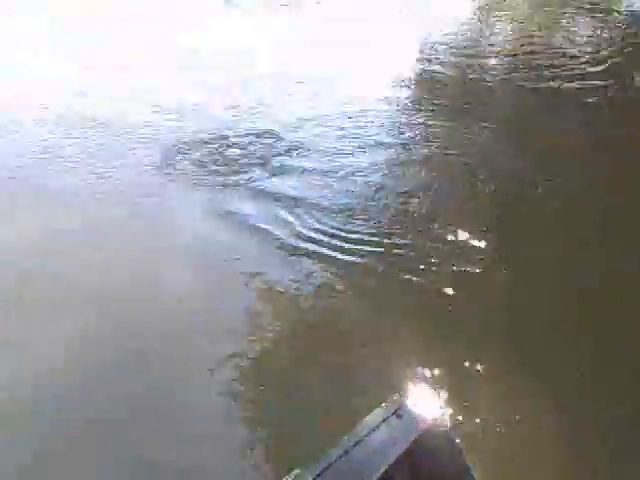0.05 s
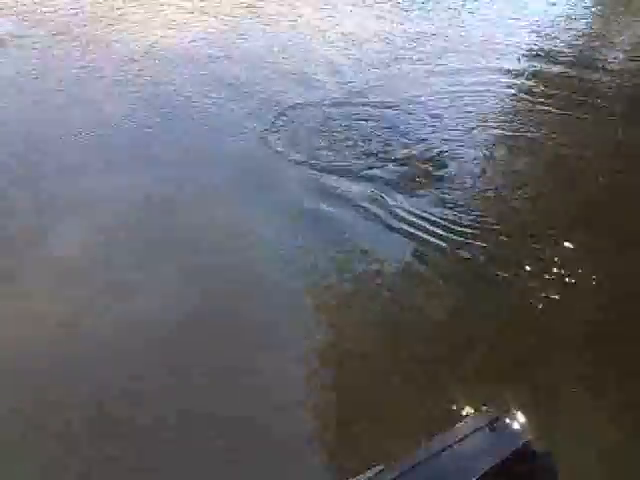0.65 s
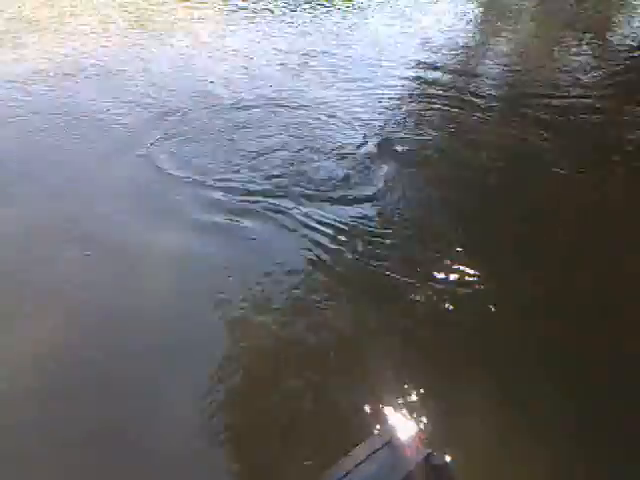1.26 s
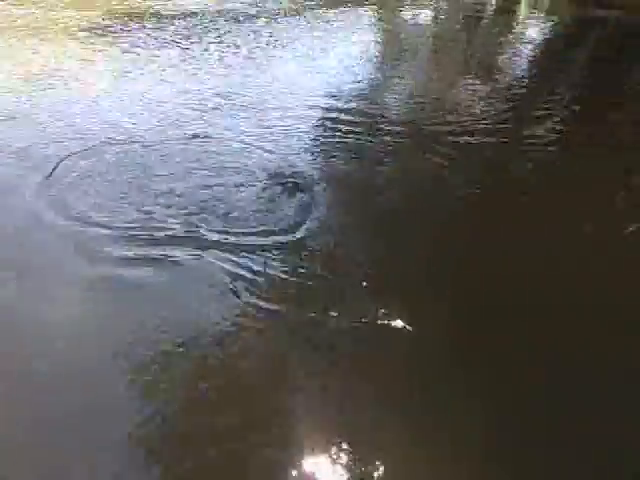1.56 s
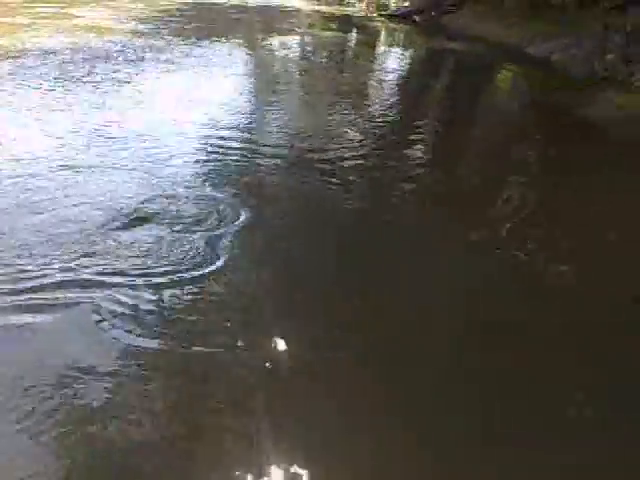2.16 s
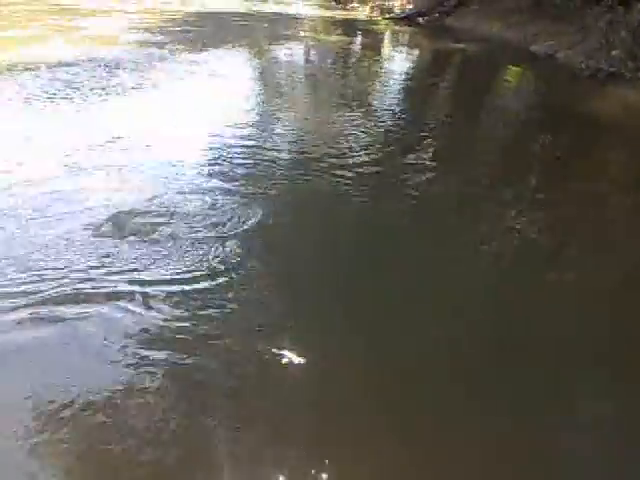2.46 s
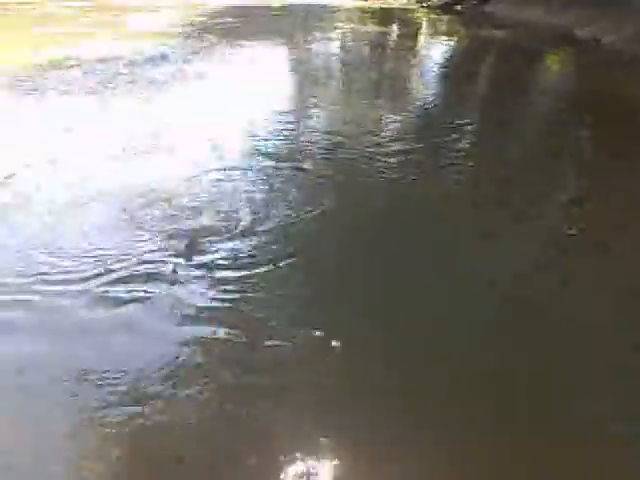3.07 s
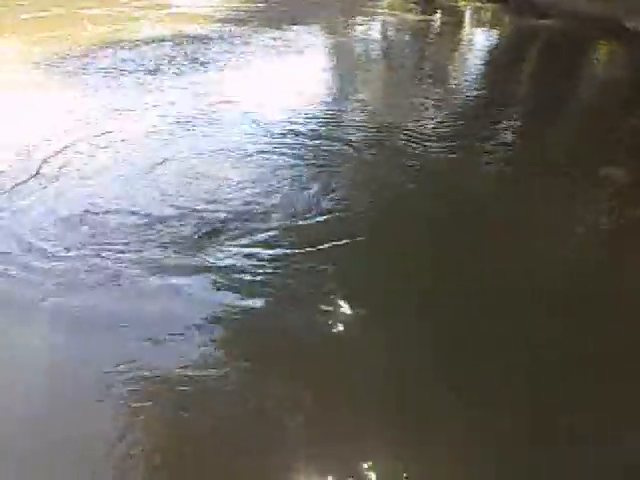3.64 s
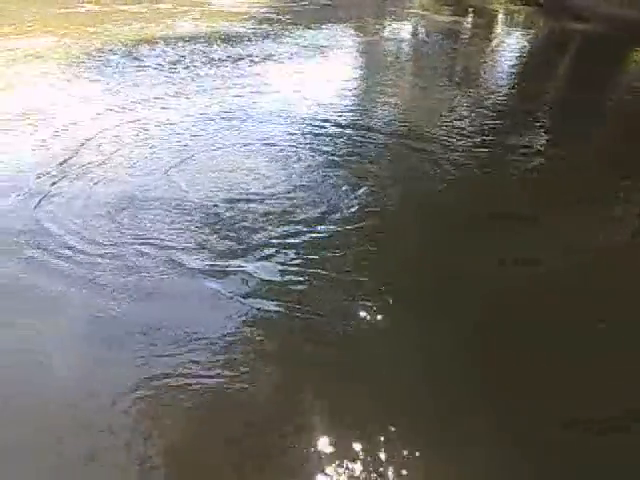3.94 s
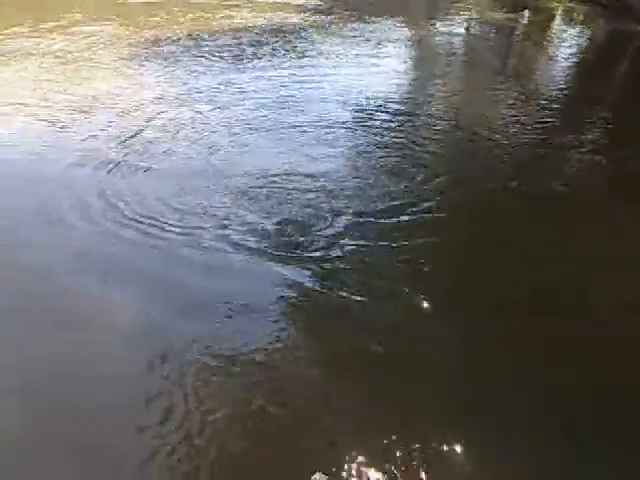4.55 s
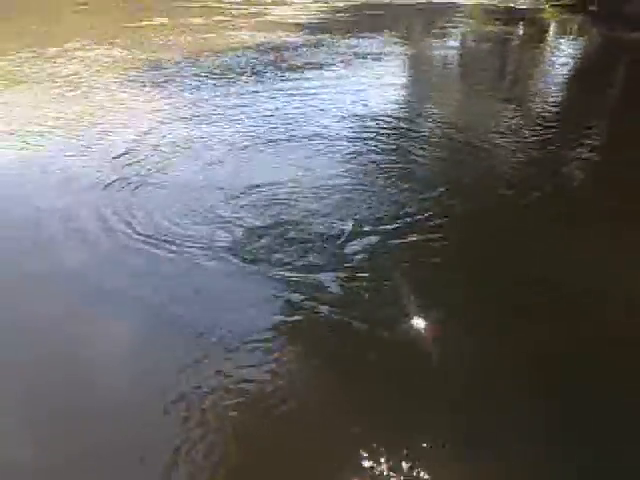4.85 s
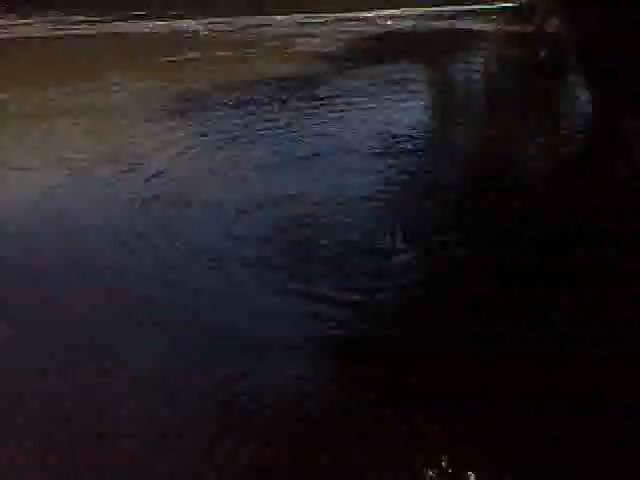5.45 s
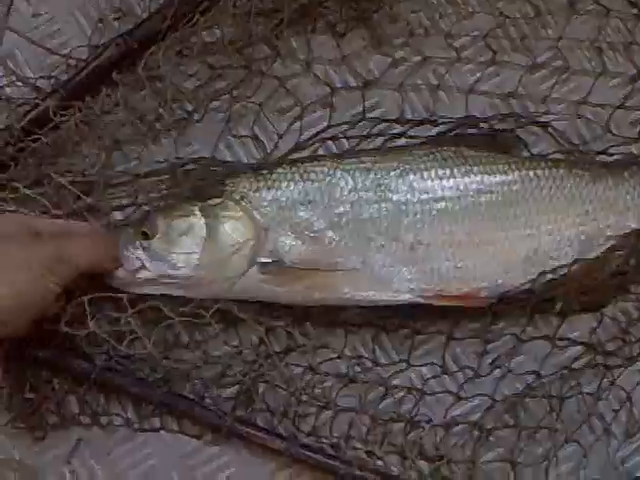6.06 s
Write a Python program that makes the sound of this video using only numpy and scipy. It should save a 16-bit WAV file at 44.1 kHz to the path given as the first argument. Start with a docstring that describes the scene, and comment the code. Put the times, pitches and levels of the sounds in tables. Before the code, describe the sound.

A hooked fish splashes and plops in a river over faint hiss, then gear knocks on a boat and scrapes the microphone.

```python
"""Splashes and plops come first: a hooked fish thrashes near a small boat, over river hiss and a low hum.
Each flick of its tail traps air that rings as bubbles, and throws spray that patters back down.
After five seconds gear knocks on the boat and scrapes hard against a camera, and fingers rub and click
on its case. The camera stops for a moment of silence, then starts again over the quiet deck."""
import sys
import numpy as np
from scipy import signal
from scipy.fft import rfft, irfft
from scipy.io import wavfile
from scipy.ndimage import uniform_filter1d

SR = 44100
rng = np.random.default_rng(int(sys.argv[2]) if len(sys.argv) > 2 else 0)


def wrap_up_sound(samples):
    """Save the sound to the file named by the first command line argument, as 16-bit audio."""
    columns = np.atleast_2d(samples).T
    # keep every value between -1 and 1, then stretch to whole-number steps
    tamed = np.clip(columns, -1, 1)
    steps = np.round(tamed * 32767).astype(np.int16)
    wavfile.write(sys.argv[1], SR, steps)


N = 278271
TIME = np.arange(N) / SR
STOP_S, RESTART_S = 5.89, 6.115


def amp(db):
    """Turns decibels into a gain."""
    return 10 ** (np.asarray(db) / 20)


def unit(x):
    """Scales a sound to an average (rms) level of 1."""
    return x / np.sqrt(np.mean(x ** 2) + 1e-20)


def level_at(tone, hz):
    """Reads the level in dB at any pitch from a tone table."""
    pitch_hz, level_db = np.transpose(tone)
    return np.interp(np.log(hz + 1), np.log(pitch_hz + 1), level_db)


def colour(x, tone):
    """Shapes the lows and highs of a sound by a tone table, at an average level of 1."""
    hz = np.fft.rfftfreq(len(x), 1 / SR)
    return unit(irfft(rfft(x) * amp(level_at(tone, hz)), len(x)))


def add(mix, start_s, sound):
    """Mixes a sound in at its start time."""
    part = mix[max(round(start_s * SR), 0):][:len(sound)]
    part += sound[:len(part)]


def envelope(t, rise_s, hold_s, fade_s):
    """Rises, holds, then dies away; a fade time is how long a sound takes to fall by 60 dB."""
    rise = np.sin(np.pi / 2 * np.clip(t / rise_s, 0, 1)) ** 2
    return rise * np.exp(-np.log(1000) * np.maximum(t - rise_s - hold_s, 0) / fade_s)


def patter(per_s, spread_db, size):
    """Tiny impacts at random moments, a few much larger than the rest."""
    hits = rng.random(size) < per_s / SR
    sign = rng.choice([-1, 1], size)
    strength = np.minimum(rng.exponential(1, size), 4)
    return hits * sign * amp(spread_db * strength)


def bubble(hz, fade_s, rise_cycles=1.8, glide=0.067):
    """An air pocket rings, its pitch climbing as it nears the surface."""
    t = np.arange(int((fade_s + rise_cycles / hz) * SR)) / SR
    phase = 2 * np.pi * hz * (t + glide * t ** 2 / (2 * fade_s))
    return envelope(t, rise_cycles / hz, 0, fade_s) * np.sin(phase)


def swarm(low_hz, high_hz, per_s, spread_db, cycles, sizes=60):
    """Bubbles of many sizes form at random moments, each ringing for a number of cycles."""
    out = np.zeros(N)
    bubbles = [bubble(hz, cycles / hz) * np.sqrt(hz) for hz in np.geomspace(low_hz, high_hz, sizes)]
    for when, which, chance in rng.random((int(per_s * N / SR), 3)):
        strength = min(-np.log(1 - chance), 4)
        add(out, when * N / SR, amp(spread_db * strength) * bubbles[int(which * sizes)])
    return out


# Tone of the air over the deck: pitch_hz, level_db
DECK_TONE = [(24, -39.5), (40, 1.5), (203, -12), (410, -12), (442, -9), (513, -14), (1360, -12), (2140, -8),
             (3030, -20.5), (5960, -17), (15800, -25.5)]

def deck_air(level_db=-71.5):
    """Still air over the deck makes a faint, low rush."""
    return amp(level_db) * colour(rng.standard_normal(N), DECK_TONE)


# Tone of the river and microphone hiss: pitch_hz, level_db
HISS_TONE = [(25, -10.5), (45, -10), (100, -13.5), (200, -13.5), (380, -11.5), (650, -10), (900, -12.5),
             (1500, -12.5), (2500, -17), (4500, -18.5), (7500, -19), (10000, -20.5), (15800, -19.5)]

def river_air(hiss_db=-65, waver_db=0.03, hum_hz=67.5, hum_db=-68, hum_fade_db_per_s=2.5):
    """The open river hisses softly over a slowly fading hum, perhaps a far motor."""
    hiss = colour(rng.standard_normal(N), HISS_TONE)
    waver = unit(uniform_filter1d(uniform_filter1d(rng.standard_normal(N), 3000), 3000))
    hum = np.sqrt(2) * np.sin(2 * np.pi * hum_hz * TIME)
    return hiss * amp(hiss_db + waver_db * waver) + hum * amp(hum_db - hum_fade_db_per_s * TIME)


def held(db, fall_db_per_s):
    """Follows a level up at once and down at a steady rate."""
    return np.maximum.accumulate(db + fall_db_per_s * TIME) - fall_db_per_s * TIME


def background_gain(sound, open_above_db=-40, dip_above_db=-23.5):
    """The camera's noise suppressor lets the background swell on loud sounds; after the loudest, the camera's
    level control ducks it and lets it back slowly."""
    level_db = 10 * np.log10(abs(uniform_filter1d(sound ** 2, size=220)) + 1e-12)
    swell_db = held(np.clip(0.8 * (level_db - open_above_db), 0, 18), fall_db_per_s=41.5)
    dip_db = held(np.clip(level_db - dip_above_db, 0, 7), fall_db_per_s=6.5)
    return amp(swell_db - dip_db)


# Notes the hull rings with: pitch_hz, level_db, fade_s
HULL_NOTES = [(81, -19.5, 0.2), (237, -9.5, 0.14), (350, -6.5, 0.068), (465, -9, 0.063), (528, 2, .14),
              (630, -7, .13), (776.6, -2.5, .12), (1168, -6, 0.097), (1740, -6.5, 0.089)]
# Tone of a thud: pitch_hz, level_db
THUD_TONE = [(30, -16), (80, -18.5), (160, -23), (240, -6.5), (350, -6.5), (560, 1.5), (900, -3),
             (1400, -2.5), (2100, -4.5), (3700, -7.5), (6000, -13.5), (8000, -16.5), (10000, -23),
             (15800, -25.5)]
# Bumps of gear on the boat: start_s, ring_db, thud_db, thud_fade_s
BUMPS = [(5.1288, -20.5, -10, .017), (5.154, -29, -12, 0.013), (5.188, -42.5, -15.5, 0.0053)]

def knocking(ring_rise_s=0.00093, thud_rise_s=0.0017, hold_share=0.28):
    """Gear bumps the boat with a dull thud, and the hull gives a short, low ring."""
    out, t = np.zeros(N), np.arange(SR // 2) / SR
    for start_s, ring_db, thud_db, thud_fade_s in BUMPS:
        ring = sum(amp(db) * envelope(t, ring_rise_s, 0, fade_s)
                   * np.sin(2 * np.pi * (hz * t + rng.random())) for hz, db, fade_s in HULL_NOTES)
        thud = colour(rng.standard_normal(len(t)), THUD_TONE)
        thud *= envelope(t, thud_rise_s, hold_share * thud_fade_s, thud_fade_s)
        add(out, start_s, amp(ring_db) * ring + amp(thud_db) * thud)
    return out


# Tones of a hard rub and a light rub: pitch_hz, level_db
HARD_RUB_TONE = [(30, -16), (80, -16), (160, -22.5), (230, -9), (350, -7.5), (520, 0), (900, -8),
                 (1350, -3), (2100, -7.5), (3200, -7.5), (4800, -2), (6000, -7.5), (7600, -4), (9500, -8.5),
                 (15800, -14.5)]
LIGHT_RUB_TONE = [(50, -21.5), (150, -19.5), (300, -8), (480, -8), (750, 0.5), (1300, -1.5), (1800, -5.5),
                  (3000, -12), (5500, -6), (7500, -7), (8600, -16), (9800, -29), (15500, -23)]
# Strokes along the camera case: start_s, level_db, hold_s, fade_s
RUB_STROKES = [(5.133, -7, 0.016, 0.041), (5.154, -28, 0.024, 0.1), (5.185, -25, 0.0055, .13),
               (5.206, -30.5, .003, 0.15), (5.278, -41.5, 0.02, 0.091), (5.323, -62, 0.019, 0.99),
               (5.437, -54, 0.0028, 0.16), (5.506, -59.5, 0.05, 0.26), (5.67, -62.5, .015, 0.24),
               (5.751, -62.5, 0.015, 0.17)]

def rubbing(light_db=-26.5, hard_db=-2, peak_db=6, peak_octaves=0.19, tilt_db_per_octave=0.4):
    """Many tiny slips shake the case; softer strokes sound duller and start more gently."""
    out, t = np.zeros(N), np.arange(16384) / SR
    hz = np.fft.rfftfreq(len(t), 1 / SR)
    for start_s, level_db, hold_s, fade_s in RUB_STROKES:
        slips = patter(per_s=9000, spread_db=2.5, size=len(t))
        pressure = np.clip((level_db - light_db) / (hard_db - light_db), 0, 1)
        tone_db = pressure * level_at(HARD_RUB_TONE, hz) + (1 - pressure) * level_at(LIGHT_RUB_TONE, hz)
        tone_db += tilt_db_per_octave * np.log2(1 + hz / 700)
        softer_db = hard_db - level_db
        peak_hz = 8400 * 2 ** (0.6 * softer_db)  # far above hearing for these strokes
        tone_db += peak_db / (1 + (np.log2((hz + 1) / peak_hz) / peak_octaves) ** 2)
        scrape = unit(irfft(rfft(slips) * amp(tone_db)))
        rise_s = 0.0033 * 2 ** (softer_db / 17.5)
        add(out, start_s, amp(level_db) * scrape * envelope(t, rise_s, hold_s, fade_s))
    return out


# Short notes of the case: pitch_hz, level_db, fade_s
CLICK_NOTES = [(1610, -3.5, 0.0071), (2157, -6, 0.0066), (2512, -0.5, 0.0073), (2965, 1.5, .0045),
               (3400, -3, .0038), (4800, -14.5, .005), (6320, -8.5, 0.0017), (7250, 6.5, 0.0019),
               (8646, -14.5, .004), (11800, -17.5, .003), (14820, -12.5, .003)]
# A faint, high ringing that lingers after each click: pitch_hz, level_db, fade_s
HIGH_RINGING = [(2300, -5, 0.075), (2593, -1, .11), (2950, -2.5, 0.053), (3397, -1, .072),
                (6584, -6.5, .09), (6751, -2.5, .08), (7750, -2, 0.083), (8672, -9.5, 0.083)]
# Finger taps: start_s, level_db, centre_hz, width_octaves, fade_stretch (times the short notes' fade_s)
FINGER_TAPS = [(.0598, 1, 7000, 0.72, 2.26), (5.1885, 4, 5900, 0.6, 0.488), (5.3082, -35, 5000, 1.5, .8),
               (5.46, -29.5, 2200, 0.31, 1.9), (5.5568, -22, 6850, 1.16, 2.2),
               (5.8562, -29, 8920, 1.2, 0.44), (5.886, -42, 4000, 2.05, 2.8)]

def tapping(rise_s=0.00036, crack_db=-20, fizz_db=-46, ringing_db=-40):
    """A tap cracks and briefly rings the case. A faint, high ringing lingers after each click."""
    out, t = np.zeros(N), np.arange(4096) / SR

    def note(hz, db, fade_s):
        """One dying note."""
        return amp(db) * envelope(t, rise_s, 0, fade_s) * np.sin(2 * np.pi * hz * t)

    ringing = sum(note(*row) for row in HIGH_RINGING)
    for start_s, level_db, centre_hz, width_octaves, stretch in FINGER_TAPS:
        # notes near centre_hz are struck hardest
        click = sum(note(hz, db, fade_s * stretch) / (1 + (np.log2(hz / centre_hz) / width_octaves) ** 2)
                    for hz, db, fade_s in CLICK_NOTES)
        crack = unit(np.gradient(rng.standard_normal(len(t)))) * envelope(t, rise_s, 0, 0.0011)
        fizz = unit(signal.fftconvolve(rng.standard_normal(len(t)), click)[:len(t)])
        fizz *= envelope(t, rise_s, 0, 0.23)
        tail = amp(fizz_db) * fizz + amp(ringing_db) * ringing
        add(out, start_s, amp(level_db) * (click / abs(click).max() + amp(crack_db) * crack + tail))
    return out


def river_echo(splashes, fade_s=0.12, echo_db=-17):
    """The hull and the bank scatter a little of each splash back."""
    t = np.arange(SR // 2) / SR
    reflections = patter(per_s=3000, spread_db=1, size=len(t))
    tail = colour(reflections, [(200, -1.5), (1000, -1), (6000, -6), (15000, -14.5)])
    tail *= envelope(t, 0.0031, 0, fade_s)
    return splashes + amp(echo_db) * signal.oaconvolve(splashes, tail / np.linalg.norm(tail))[:N]


# The largest drops hitting the water: start_s, level_db, pitch_hz
BIG_DROPS = [(0.135, -39, 6230), (0.158, -43, 7000), (0.195, -44, 6950), (.982, -60, 3080),
             (1.865, -57.5, 3060), (2.32, -56.5, 5200), (2.483, -51, 6600), (2.816, -51.5, 5140),
             (3.456, -47, 2460), (3.656, -53, 3630), (4.557, -48, 6860), (4.866, -46, 5340)]

def drops(fade_s=0.019, tick_db=-8.5, ping_db=-3):
    """A falling drop ticks on the surface and pings a tiny bubble."""
    out, t = np.zeros(N), np.arange(2048) / SR
    for start_s, level_db, hz in BIG_DROPS:
        tick_tone = [(hz / 4, -26), (hz / 2, -14), (hz, 0), (hz * 1.24, -10), (hz * 2, -22)]
        tick = colour(rng.standard_normal(len(t)), tick_tone) * envelope(t, 0.0021, 0, fade_s)
        add(out, start_s, amp(level_db + tick_db) * tick)
        add(out, start_s, amp(level_db + ping_db) * bubble(hz, fade_s))
    return out


# Tone of stirred water, for ripples and thrashing: pitch_hz, level_db
CHURN_TONE = [(150, -22.5), (350, -12), (600, -4.5), (950, 4.5), (1400, -7), (2300, -2), (3500, -15),
              (6000, -23)]

def ripples(level_db=-76):
    """The fish's wake keeps up a faint trickle until it tires."""
    plinks = swarm(550, 4500, per_s=130, spread_db=2.9, cycles=24)
    return amp(level_db) * colour(plinks, CHURN_TONE) * np.interp(TIME, [5.1, 5.6], [1, 0])


# Tone of the spray: pitch_hz, level_db
SPRAY_TONE = [(1200, -18.5), (2500, -5.5), (4000, -5), (5500, -3), (7300, 3), (8300, -2.5), (9500, -14.5),
              (15500, -15.5)]
# Flicks of the fish's tail: start_s, churn_db, spray_db, fade_s
TAIL_FLICKS = [(-.015, -59.5, -59, 0.3), (0.093, -51.5, -63.5, 0.54), (.668, -66.5, -74, 0.94),
               (0.814, -72, -69, .4), (.87, -70, -82.5, .8), (1.77, -72.5, -69, 0.73),
               (2.0, -82.5, -65, .45), (2.571, -50.5, -55, 0.51), (3.336, -56.5, -58, 0.97),
               (3.56, -64.5, -64.5, 0.68), (4.642, -62, -64, .7), (4.788, -53, -61.5, 0.68),
               (4.843, -55.5, -67, .22)]

def thrashing(slosh_db=2, mist_db=-2, rise_s=0.017):
    """The tail churns up small bubbles in a slosh, and throws droplets in a fine mist."""
    bubbles = unit(swarm(300, 4500, per_s=1500, spread_db=3.6, cycles=18))
    slosh = unit(patter(per_s=1200, spread_db=3.5, size=N))
    churn = colour(bubbles + amp(slosh_db) * slosh, CHURN_TONE)
    pings = unit(swarm(2500, 9000, per_s=600, spread_db=4, cycles=18))
    ticks = unit(patter(per_s=350, spread_db=4, size=N))
    spray = colour(unit(pings + ticks) + amp(mist_db) * rng.standard_normal(N), SPRAY_TONE)
    out, t = np.zeros(N), np.arange(SR) / SR
    for start_s, churn_db, spray_db, fade_s in TAIL_FLICKS:
        water = amp(churn_db) * churn + amp(spray_db) * spray
        first = max(round(start_s * SR), 0)
        add(out, start_s, envelope(t, rise_s, 0, fade_s) * water[first:first + SR])
    return out


def falling_spray(relative_db=-9.5, rise_s=0.11, fade_s=0.7):
    """Water thrown up by each flick lands a moment later as scattered plinks."""
    plinks = unit(swarm(1400, 7500, per_s=90, spread_db=3, cycles=30))
    landing = sum(amp(spray_db) * envelope(TIME - start_s, rise_s, 0, fade_s)
                  for start_s, _, spray_db, _ in TAIL_FLICKS)
    return amp(relative_db) * landing * plinks


# Tone of a wet slap: pitch_hz, level_db
SLAP_TONE = [(250, -16.5), (500, -20), (900, 7.5), (1500, 4), (2300, -2.5), (4000, -10), (7500, -11.5),
             (10000, -32)]
# Air pockets trapped by the tail: start_s, level_db, pitch_hz, slap_db (higher means more slap)
AIR_POCKETS = [(.066, -47, 350, 3), (.111, -43.5, 2800, -7), (.120, -46, 2040, 1), (.169, -38, 950, -7.5),
               (0.186, -48.5, 966, 5), (0.678, -48, 811, -8), (.698, -54.5, 654, -13.5),
               (.677, -59.5, 294, -18), (0.896, -51, 1730, -14), (1.796, -55, 850, -15.5),
               (1.811, -51, 1643, -17.5), (1.915, -59.5, 1740, -6), (2.023, -58, 370, -8.5),
               (2.058, -59.5, 345, -20), (2.4825, -56, 1910, 3.5), (2.568, -29, 775, -17),
               (2.5744, -26, 1007, -6), (2.618, -44, 2410, -0.5), (2.665, -51, 798, -22.5),
               (3.339, -34.5, 810, -9), (3.3568, -35, 1735, -5.5), (3.358, -39, 2440, -14),
               (3.359, -41.5, 1025, -4), (3.567, -51.5, 790, -1), (3.569, -57, 387, -17.5),
               (3.587, -42, 1630, -10.5), (3.961, -60, 1640, -12), (4.119, -61, 1080, -13.5),
               (4.556, -51, 738, -5), (4.618, -45.5, 1560, -6.5), (4.639, -49, 667, -5),
               (4.789, -37.5, 1052, -18), (4.832, -43, 924, -20), (4.862, -43, 995, -1),
               (4.998, -46.5, 1615, -5), (4.997, -50, 840, -4)]

def plops(slap_fade_s=0.016):
    """Each large air pocket rings under the wet slap that closes it."""
    out, t = np.zeros(N), np.arange(2048) / SR
    for start_s, level_db, pitch_hz, slap_db in AIR_POCKETS:
        fade_s = 0.041 * (1000 / pitch_hz) ** 0.7  # larger, lower pockets ring longer
        fade_s *= 2 ** ((-46.5 - level_db) / 30.5)  # violent ones break up sooner
        slap = colour(rng.standard_normal(len(t)), SLAP_TONE) * envelope(t, 0.0029, 0, slap_fade_s)
        add(out, start_s, amp(level_db) * bubble(pitch_hz, fade_s, rise_cycles=3.7))
        add(out, start_s, amp(level_db + slap_db - 1.5) * slap)
    return out


def scene():
    """The river until the camera stops, a short silence, then still air over the deck."""
    water = river_echo(plops() + drops() + thrashing() + falling_spray() + ripples())
    near = water + knocking() + rubbing() + tapping()
    air = river_air()
    river = near + air * background_gain(near + air)
    return (river * (TIME < STOP_S) + deck_air() * (TIME > RESTART_S))[None]


def record(dry, ceiling=0.71, offset=-0.0007, top_hz=15900):
    """The microphone overloads on hard hits and the converter sits slightly off zero; the highest treble is
    cut."""
    clipped = ceiling * np.tanh(dry / ceiling) + offset * np.clip((STOP_S - TIME) * 20, 0, 1)
    treble_cut = signal.firwin(511, top_hz, window=("kaiser", 9), fs=SR)
    return signal.oaconvolve(clipped, treble_cut[None], "same")


dry = scene()
out = record(dry)
wrap_up_sound(out)
```